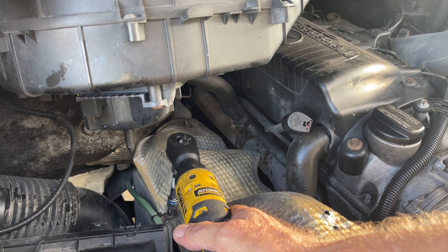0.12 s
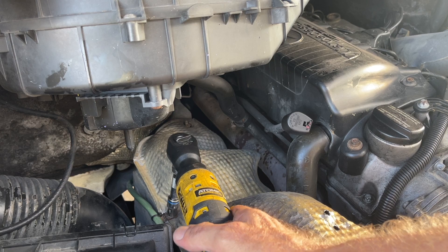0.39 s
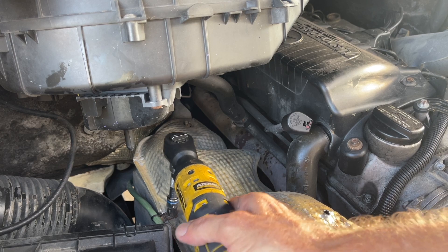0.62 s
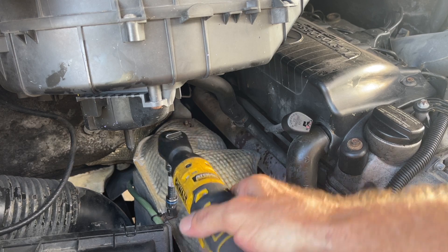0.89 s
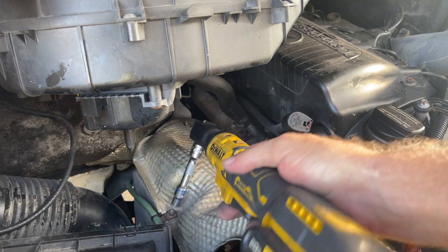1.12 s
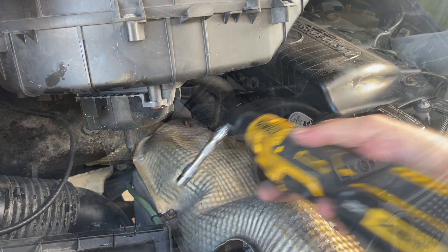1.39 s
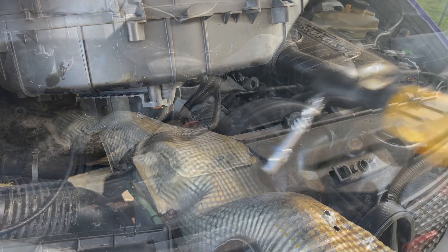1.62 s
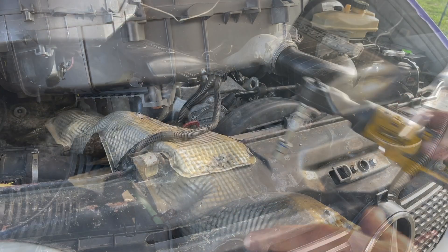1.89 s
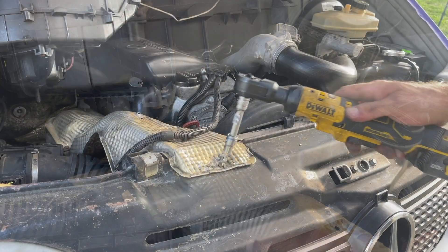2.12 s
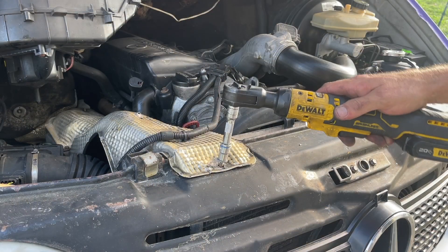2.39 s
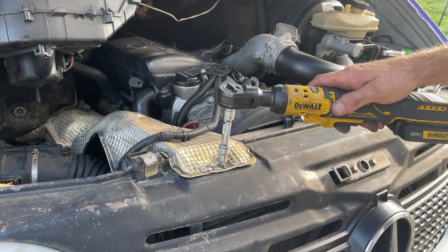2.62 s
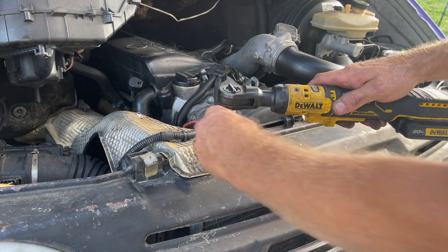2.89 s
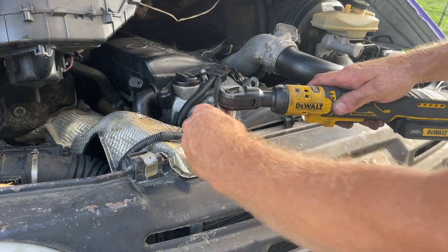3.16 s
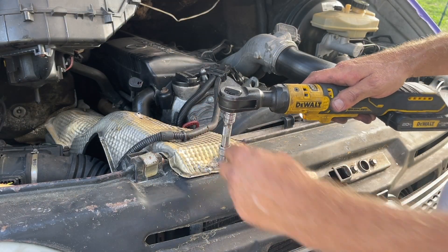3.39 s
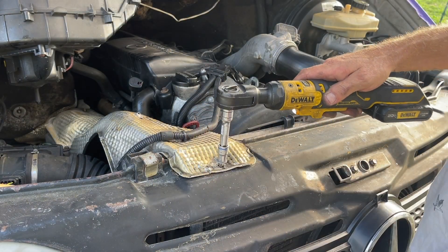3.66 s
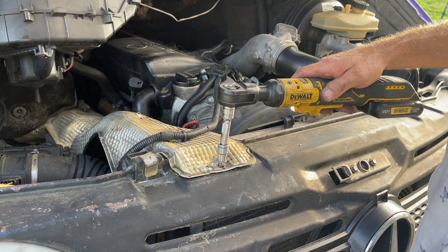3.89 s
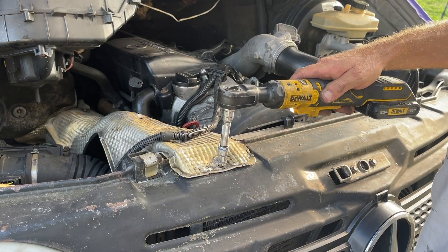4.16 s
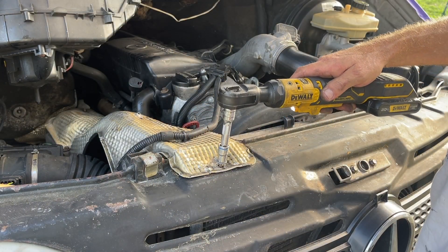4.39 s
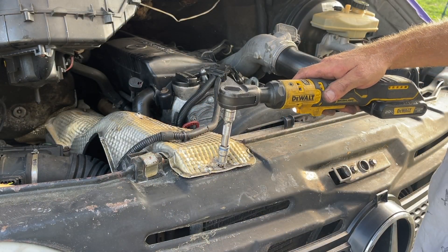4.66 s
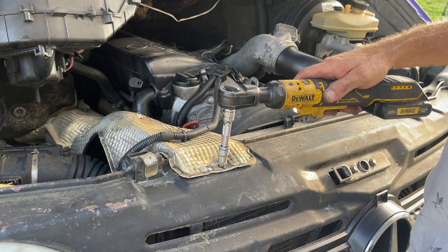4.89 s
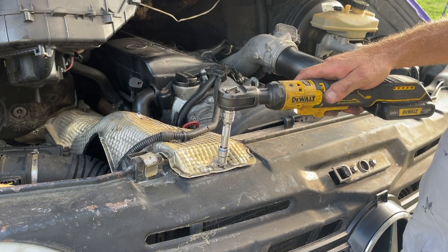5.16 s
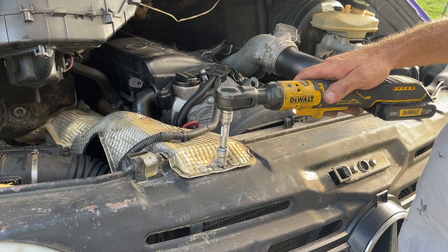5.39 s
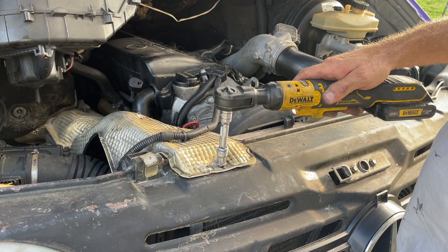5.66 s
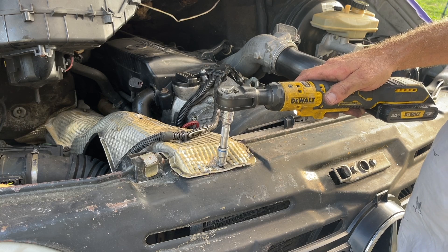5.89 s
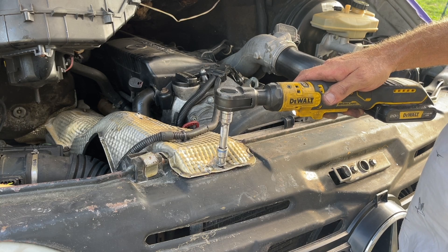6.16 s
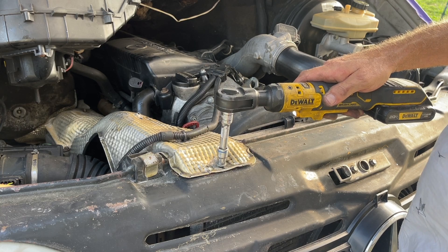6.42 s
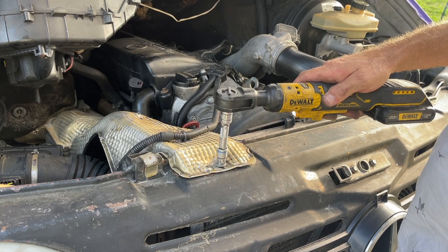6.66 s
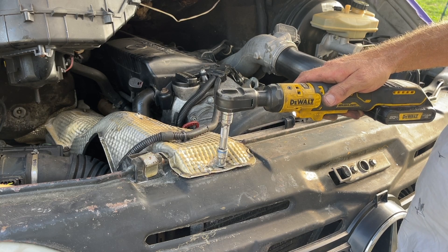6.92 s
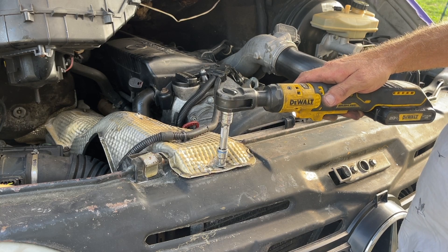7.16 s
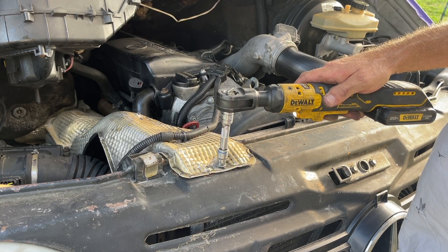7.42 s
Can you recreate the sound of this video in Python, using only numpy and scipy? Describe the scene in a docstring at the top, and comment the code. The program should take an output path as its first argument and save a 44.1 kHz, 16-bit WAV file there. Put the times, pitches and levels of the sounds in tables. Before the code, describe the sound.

Close stereo pickup in an open engine bay outdoors, with low air rumble and very faint outdoor noise. From 0 to 0.4 s a cordless ratchet ends a slow burst: about eight turns a second, each a bright ringing double click over motor whirr and gear whine. It stops. Soft hand thumps follow, light knocks from 0.8 s and a sharper one at 1.05 s, then near quiet with faint rubbing. Metal clacks come at 2.2 to 2.3 s, the strongest socket clunk at 2.38 s. At about 2.8 s the motor restarts; double clicks begin at 2.9 s, quicken, and from 3.6 s merge into a fast rattling buzz with rising whine. It steps up again near 4.8 s, peaking around 5.2 s, eases slightly, then drops from 6.15 s. By 6.7 s it is quieter, even clicking at about fifteen turns a second, still running at the 7.5 s end.

```python
"""A cordless ratchet in an open engine bay: the end of a slow burst, the tool is lifted off and set on another bolt,
then it runs up, spins fast and slows again. Once a crank turn the pawl skips back over two teeth (a bright double click
of ringing contact bursts), then drives the wheel while the gear teeth whine as a stack of partials.
The motor whirrs under it (noise, housing rings, shaft tones), and the hand knocks and rubs on metal.
Low air rumble on the microphone and a faint outdoor noise lie behind."""
import sys
import numpy as np
from scipy import signal
from scipy.fft import rfft, irfft, next_fast_len
from scipy.io import wavfile

SR = 44100
rng = np.random.default_rng(int(sys.argv[2]) if len(sys.argv) > 2 else 0)


def volts_from_db(level):
    """Convert decibel levels to linear amplitude ratios."""
    exponent = np.asarray(level, float) / 20
    return 10 ** exponent


def to_wav(sig):
    """Store sig (one row per channel, or 1-D mono) as 16-bit WAV at the path in sys.argv[1].

    Samples outside -1..1 are clipped; the rate is SR.
    """
    pcm = np.clip(np.atleast_2d(sig), -1, 1) * 32767
    pcm = np.round(pcm).astype(np.int16)
    wavfile.write(sys.argv[1], SR, pcm.T)  # frames by channels


N = 332514  # length in samples

# Trigger pulls. Each row: start in seconds, first click in seconds.
PULLS = [(0, .096), (2.765, 2.8862)]
USUAL_SPEED = 17  # crank turns per second at which the tool's levels are stated


def rms_one(x):
    """Scale to an rms of one."""
    return x / np.sqrt(np.mean(x ** 2) + 1e-20)


def in_time(rows, off=None):
    """Draw each column as a curve over time; off is the value outside the rows."""
    s, *columns = np.transpose(rows)
    return [np.interp(np.arange(N) / SR, s, column, left=off, right=off) for column in columns]


def at_hz(points, hz):
    """Read a (Hz, value) curve on a logarithmic frequency axis."""
    point_hz, value = np.transpose(points)
    return np.interp(np.log(hz + 1), np.log(point_hz), value)


def colour(x, points):
    """Filter by a (Hz, dB) curve."""
    size = next_fast_len(N)
    gain = volts_from_db(at_hz(points, np.fft.rfftfreq(size, 1 / SR)))
    return irfft(rfft(x, size) * gain, size)[..., :N]


def drift(rate_hz):
    """Slow random wander of rms one: noise through two equal low-pass poles."""
    r = np.exp(-2 * np.pi * rate_hz / SR)
    wander = signal.lfilter([1], [1, -2 * r, r * r], rng.standard_normal(N + SR))
    return rms_one(wander[SR:])


def held(start_s, length_s, edge_s):
    """Envelope that ramps up, holds at one and ramps down."""
    t = np.arange(N) / SR
    return np.clip(np.minimum(t - start_s, start_s + length_s - t) / edge_s, 0, 1)


def dying_away(x, t60_s):
    """Give every impulse an exponential tail that falls 60 dB in t60_s."""
    return signal.lfilter([1], [1, -volts_from_db(-60 / (t60_s * SR))], x + 1e-18)


def resonate(x, hz, width_hz):
    """One ringing mode: a two-pole resonator."""
    r = np.exp(-np.pi * width_hz / SR)
    poles = [1, -2 * r * np.cos(2 * np.pi * hz / SR), r * r]
    return signal.lfilter([(1 - r * r) / 2, 0, (r * r - 1) / 2], poles, x + 1e-18)


def bank(x, modes):
    """Modes of (Hz, width Hz, dB) ringing side by side with alternating sign."""
    return sum((-1) ** k * volts_from_db(db) * resonate(x, hz, width) for k, (hz, width, db) in enumerate(modes))


def grains(per_s, spread_db):
    """Random sparse impulses of either sign and uneven size."""
    sizes = volts_from_db(spread_db * np.minimum(rng.exponential(1, N), 4)) * rng.choice([-1, 1], N)
    return sizes * (rng.random(N) < per_s / SR)


def stereo_noise(points, side_db):
    """Coloured noise: a part common to both channels and a part opposed, at side_db against it."""
    mid, side = rng.standard_normal((2, N))
    return rms_one(colour(mid + volts_from_db(side_db) * side * [[1], [-1]], points))


def crank(speed):
    """Turn phase 0-1 counted from the first click, and the train of tooth strikes, two a turn."""
    # How hard the pawl snaps in the fast run. Each row: seconds, strike level in dB.
    snap = [(3.62, -19.5), (3.88, -18.5), (3.95, -23), (4.3, -22), (5.1, -24.5), (5.6, -26), (6.4, -25.5)]
    # Slow turns, each heard as its own double click.
    # Each row: start in seconds, first tooth level in dB, gap in ms, second tooth level in dB.
    slow_clicks = [(0.0005, -22.5, 2.4, -29), (0.0974, -13, 18, -18), (0.218, -15, 17, -16.5),
                   (0.34, -14, 20.2, -19), (2.8877, -13, 16.8, -15.5), (2.9744, -15, 13, -17.5),
                   (3.0466, -19.5, 7.4, -17.5), (3.1107, -19.5, 10, -18.5), (3.1682, -20.5, 10.5, -18),
                   (3.224, -19.5, 11, -18.5), (3.2812, -19, 9.8, -16), (3.3381, -12, 7.1, -21),
                   (3.3927, -18.5, 9.0, -21.5), (3.4466, -17.5, 9.2, -24), (3.4993, -19.5, 8.5, -26),
                   (3.5481, -17.5, 7.8, -22.5), (3.5849, -16.5, 5.4, -18.5), (3.6165, -15, 1.4, -23),
                   (6.3265, -31.5, 1.9, -28.5), (6.3553, -27.5, 4.8, -26.5), (6.385, -23, 4.2, -22),
                   (6.4212, -22.5, 3.5, -22.5), (6.4568, -20.5, 6.4, -28), (6.497, -26, 7, -26.5),
                   (6.5414, -26, 10, -31), (6.5898, -29.5, 8.4, -27.5), (6.6454, -26, 6.8, -24),
                   (6.7055, -25, 11.1, -24), (6.7712, -20.5, 8.4, -27), (6.8323, -25, 10.6, -29.5),
                   (6.8957, -26, 10.9, -28.5), (6.9603, -25.5, 11.5, -24.5), (7.0244, -24.5, 12.0, -20.5),
                   (7.0868, -26, 11.8, -26.5), (7.1529, -28, 10.8, -27.5), (7.2194, -27.5, 10.7, -28),
                   (7.2824, -23.5, 11, -25.5), (7.348, -22.5, 11.8, -26.5), (7.4107, -27.5, 8.2, -24.5),
                   (7.4737, -28.5, 10, -23.5)]
    # Between these two times in seconds the clicks follow the crank.
    fast_run = (3.633, 6.312)
    second_tooth = .16  # share of a turn after the first
    # the gear train loads the pawl unevenly, over this many turns
    wobble_turns, wobble_db, wobble_peak_turn = 5.25, 1, 2.2
    click_spread_db = 2

    t = np.arange(N) / SR
    total = np.cumsum(speed) / SR
    phase, strikes = np.zeros(N), np.zeros(N)
    (snap_db,) = in_time(snap)
    for start, first in PULLS:
        turns = total - np.interp(first, t, total)
        phase[t >= start] = turns[t >= start] % 1

    whole = np.arange(*np.ceil(np.interp(fast_run, t, turns)))
    luck = rng.normal(0, 1, (len(whole), 3))
    wobble = wobble_db * np.cos(2 * np.pi * (whole - wobble_peak_turn) / wobble_turns)
    for tooth in range(2):
        # strikes fall slightly ahead of the mark on average, with jitter shared by both teeth
        strike_turn = whole + tooth * second_tooth - .012 + .015 * luck[:, 2]
        i = (np.interp(strike_turn, turns, t) * SR).astype(int)
        strikes[i] = volts_from_db(snap_db[i] + wobble + click_spread_db * luck[:, tooth])
    for s, first_db, gap_ms, second_db in slow_clicks:
        pair = [int(s * SR), int((s + gap_ms / 1000) * SR)]
        strikes[pair] = volts_from_db(np.array([first_db, second_db]))
    return phase, strikes


def pawl(strikes, rattle_db, phase):
    """Each tooth click is a short burst of contact, a bounce and dying chatter; loose parts rattle on through the turn."""
    # Ratchet head rings. Each row: Hz, width in Hz, relative dB.
    head = [(7625, 207, 0), (7741, 257, 2), (8243, 345, 3), (8464, 217, 5), (8675, 443, 0),
            (9250, 440, -2.5), (10450, 1100, -4.5), (11800, 350, -10), (11700, 1200, -11.5)]
    # Dull part of a click. Each row: Hz, relative dB.
    click_body = [(300, -57.5), (1500, -4), (3000, -11), (4500, 0), (6500, -0.5), (9000, -50)]
    # The clicks' dull part against their ring. Each row: seconds, relative dB.
    body_level = [(0, 1), (2.9, 2.5), (3.6, 0), (6.2, -0.5), (6.5, -1), (7.54, -0.5)]

    bounced = strikes + 0.21 * np.roll(strikes, round(0.0036 * SR))
    contact = dying_away(bounced, 0.0097)
    tail = dying_away(strikes, 0.14)
    thud = 0.44 * dying_away(bounced, 0.019)
    chatter = 0.67 * contact * rng.standard_normal(N) + 0.15 * tail * grains(1500., 3.8)
    ring = bank(chatter + 2.94 * bounced, head)
    # the head radiates little below 7 kHz
    head_cut = signal.butter(6, 7000, "high", fs=SR, output="sos")
    ring = volts_from_db(17.0) * signal.sosfilt(head_cut, ring)
    body = volts_from_db(-4.5 + in_time(body_level)[0]) * colour(thud * rng.standard_normal(N), click_body)
    # the rattle is strongest early in the turn and fades through it
    fading = volts_from_db(rattle_db + 8.9 * (.5 - (phase - .06) % 1))
    rattle = fading * rms_one(bank(grains(3000., 7.1), head))
    return ring + body + rattle


def gears(speed, phase, whine_db):
    """Tooth partials swell on the driving stroke, their pitch sagging from its early part to its late part."""
    # Radiation of the gear teeth. Each row: Hz, dB.
    gear_colour = [(300, -2.5), (670, -13.5), (1100, -15), (1750, -15.5), (2050, -11.5), (2300, -19.5),
                   (2550, -6.5), (2850, -6), (3100, -10.5), (3350, -5), (3500, -9), (3750, -5), (4080, -1),
                   (4380, -9), (4620, -12), (5000, -7), (7000, -21.5)]
    # Strength of tooth partials 1, 2, 3 .. in relative dB.
    partials_db = [-7, 1.5, 3.5, 0, 1, 0, -0.5, -3.5, -7]
    # Gear tones that hold for a while.
    # Each row: start in seconds, length in seconds, multiple of tooth rate, relative dB.
    strain = [(3.203, 0.3, 1.005, -60), (3.697, .13, 3.92, -50), (3.784, 0.098, 2.92, -45.5),
              (3.86, 0.75, 1.104, -63)]
    teeth_per_turn = 36.6
    # driving stroke: start in turns, width in turns at usual speed, power of speed by which it narrows
    drive_from, drive_width, drive_narrows = 0.309, .11, 0.51
    sing_from_speed = 43.7  # turns per s; above it the sixth partial turns clean

    width = drive_width * (USUAL_SPEED / speed) ** drive_narrows
    middle = drive_from + 1.51 * width
    load = np.exp(-((phase - middle) / width) ** 2 / 2)
    sag = .2 * (phase - middle) * load
    tooth_hz = teeth_per_turn * speed * (1.002 + .2 / speed - sag + .005 * drift(25.))
    angle = 2 * np.pi * np.cumsum(tooth_hz) / SR
    whine = 0
    for k, db in enumerate(partials_db, 1):
        strength = volts_from_db(db + at_hz(gear_colour, k * tooth_hz) + 1.1 * drift(5.1))
        whine = whine + strength * np.sin(k * angle + k * k)
    grind = rms_one(colour(grains(4000., 1.8), gear_colour))

    steady = 2 * np.pi * teeth_per_turn * np.cumsum(speed) / SR  # angle without the sag
    sing_level = volts_from_db(-38 + 1.7 * drift(8.0)) * np.clip((speed - sing_from_speed) / 2, 0, 1)
    tones = sing_level * np.sin(6 * steady + 0.45 * drift(60.))
    for s, length, k, db in strain:
        envelope = volts_from_db(db + 3.9 * drift(27.0)) * held(s, length, 0.017)
        tones = tones + envelope * np.sin(k * steady + 1.1 * drift(40.))
    return volts_from_db(whine_db) * (.06 + load) * (1.2 * whine + .3 * grind) + 1.4 * tones


def motor(speed, phase, whirr_db, housing_db, hum_db, whistle_db):
    """Broad whirr, the housing ringing in lumps, low shaft tones, and the controller's switching whistle."""
    # Whirr. Each row: Hz, relative dB.
    whirr_colour = [(150, -10.5), (300, -1), (1000, -6.5), (2100, -4.5), (4000, -4), (7000, -2),
                    (10000, -3), (11500, 6), (13000, -9.5)]
    # Housing rings. Each row: Hz, width in Hz, relative dB.
    housing_modes = [(664, 60, 2.5), (726, 337, -1.5), (863, 30, 3), (1410, 150, -7.5)]
    # The housing's ring. Each row: seconds, change in dB.
    housing_level = [(0, -0.5), (2.8, -1.5), (3.5, -2.5), (3.7, -3), (6.4, 1), (7.54, -3.5)]
    # Shaft tones. Each row: multiple of crank speed, relative dB.
    shaft = [(3, -9.5), (5.625, -3.5), (7.625, -5)]
    # Shaft tones that stand out for a while.
    # Each row: start in seconds, length in seconds, multiple of crank speed, dB.
    drone_rows = [(3.58, 0.26, 5.5, -51.5), (3.836, 0.11, 6.5, -49.5), (3.74, 0.4, 2.93, -58.5),
                  (3.97, 0.73, 4, -58.5), (4.84, 0.58, 1, -57.5), (5.046, 0.25, 2, -51),
                  (5.452, 0.67, 2, -63.5), (4., .76, 5.625, -64), (5.4, 0.85, 5.625, -64.5)]

    # the whirr is radiated all along the housing, so it is wide
    whirr_swell = volts_from_db(1.63 * drift(32.0) + 1.93 * np.cos(2 * np.pi * (phase - .3)))
    whirr = stereo_noise(whirr_colour, side_db=-13.0) * whirr_swell
    lumps = volts_from_db(2.3 * drift(27.0) + 3.3 * np.cos(2 * np.pi * (phase - .42)))
    housing = rms_one(bank(rng.standard_normal(N) * lumps, housing_modes))
    housing = housing * volts_from_db(in_time(housing_level)[0])
    angle = 2 * np.pi * np.cumsum(speed) / SR
    hum = sum(volts_from_db(db + 2.5 * drift(2.0)) * np.sin(k * angle + 0.024 * k * drift(28.0)) for k, db in shaft)
    drones = sum(volts_from_db(db + 1.5 * drift(5.3)) * held(s, length, 0.02) * np.sin(k * angle)
                 for s, length, k, db in drone_rows)
    # noise through two narrow resonators in a row wavers like an unsteady tone
    whistle_hz, width_hz = 8870, 263.6
    narrow = resonate(rng.standard_normal(N), whistle_hz, width_hz)
    whistle = rms_one(resonate(narrow, whistle_hz, width_hz))
    return (volts_from_db(whirr_db) * whirr + volts_from_db(housing_db) * housing + volts_from_db(hum_db) * hum
            + drones + volts_from_db(whistle_db) * whistle)


def knocks():
    """Bursts of contact noise that die away; the same noise shakes the panel's modes, with new strengths each time."""
    # Knocks of tool and socket on metal. Each row: start in seconds, level in dB, ring relative dB,
    # contact decay t60 in seconds, Hz near which the struck spot rings best.
    knock_rows = [(0.4486, -58, 5, 0.13, 1490), (.778, -67.5, 17, 0.17, 600), (0.7988, -55, 10, 0.15, 650),
                  (0.8679, -48, 3.5, 0.17, 796), (0.895, -42.5, 0, 0.086, 750),
                  (0.968, -53.5, 13, 0.19, 650), (0.9993, -50, 9, 0.079, 950),
                  (1.0488, -29, 5.5, 0.064, 2435), (1.0561, -35.5, 9.5, 0.1, 940),
                  (1.2244, -68.5, 0, 0.092, 1100), (1.691, -54, -20, 0.051, 1660),
                  (1.752, -54.5, -13.5, 0.052, 1400), (1.949, -59.5, 2, 0.051, 700),
                  (2.1843, -32.5, 6, 0.08, 900), (2.2437, -47, 7, 0.21, 1500),
                  (2.279, -34, -7, 0.027, 1410), (2.354, -58, 16, 0.16, 1450),
                  (2.3748, -25.5, 2, 0.082, 1400), (2.3824, -20.5, -7, 0.096, 555),
                  (2.5226, -52, 6, 0.061, 1390), (2.562, -59.5, 14.5, 0.05, 1600),
                  (2.646, -62.5, -5, 0.13, 1710)]
    # Modes of the struck metal. Each row: Hz, relative dB, t60 in seconds.
    panel = [(275, 21.5, 0.53), (502, -3, 0.2), (628, -6.5, 0.38), (699, -6, 0.079), (870, 3, 0.19),
             (1027, -11.5, 0.45), (1146, -4.5, 0.63), (1418, -3.5, 0.18), (1530, -16, .4), (1543, -7, 0.16),
             (1724, -9.5, 0.054), (2435, -9, 0.15), (3780, -8, 0.08), (4670, -10, .065)]
    spot_db_per_octave = 13.0  # modes away from the spot's pitch are struck less

    t = np.arange(SR // 2) / SR
    noise = rms_one(colour(rng.standard_normal(N), [
        (100, -22), (280, -13), (800, -5.5), (1600, -8.5), (3000, -8.5), (9000, -9.5), (12500, -13.5)]))
    dull = rms_one(colour(rng.standard_normal(N), [
        (120, -19.0), (280, 0.5), (420, -6.5), (800, -3.5), (1500, -15.0), (3000, -34.0)]))
    luck_db = rng.normal(0, 3, (len(knock_rows), len(panel)))
    contact, boom, shake = np.zeros(N), np.zeros(N), np.zeros((len(panel), N))
    for (s, db, low_db, t60, spot_hz), draw_db in zip(knock_rows, luck_db):
        i = int(s * SR)
        burst = volts_from_db(db - 8.5 - 60 * t / np.clip(t60, .02, .5)) * np.minimum(t / 0.0013, 1) ** 2
        contact[i:i + len(t)] += burst
        # the bodywork booms on for longer
        boom_db = db - 13.0 + 0.56 * low_db - 60 * t / np.clip(2.61 * t60, .02, .5)
        boom[i:i + len(t)] += volts_from_db(boom_db) * np.minimum(t / 0.0043, 1)
        octaves_off = abs(np.log2(np.array(panel)[:, 0] / spot_hz))
        mode_gain = volts_from_db(low_db + draw_db - spot_db_per_octave * octaves_off)
        shake[:, i:i + len(t)] += mode_gain[:, None] * burst
    # a mode's width in Hz follows from its decay time
    rings = sum(volts_from_db(db + 21.0) * resonate(noise * envelope, hz, np.log(1000) / np.pi / t60)
                for (hz, db, t60), envelope in zip(panel, shake))
    return noise * contact + dull * boom + rings


def bay(x):
    """Direct sound reaches two ports with its own level and phase; sound scattered by metal around differs at each."""
    # Scattered sound in the bay. Each row: Hz, dB.
    echoes = [(200, -21.5), (600, -1.5), (2500, -5), (6000, -4), (9000, -22.5), (12500, -0.5)]
    # Between the two microphone ports. Each row: Hz, radians by which left leads.
    lead = [(0, 0), (780, 0.1), (1460, -.2), (2670, .7), (3700, 0.08), (5080, 1.48), (6630, 0.75),
            (7320, 0.96), (7750, 1.36), (8870, -1.17), (9820, -2), (10400, -3), (11200, -5.8),
            (12300, -6.2)]
    # Each row: Hz, left minus right in dB.
    lean = [(60, -1), (230, 2), (850, 2.5), (3220, 3.5), (12200, 0.5)]
    bay_t60_s = 0.067

    size = next_fast_len(N)
    side = np.array([[.5], [-.5]])
    hz = np.fft.rfftfreq(size, 1 / SR)
    t = np.arange(SR // 8) / SR
    ports = volts_from_db(side * at_hz(lean, hz)) * np.exp(1j * side * np.interp(hz, *np.transpose(lead)))
    scatter = rng.standard_normal((2, len(t))) * volts_from_db(-60 * t / bay_t60_s) * (t > .001)
    scatter = rfft(scatter / np.linalg.norm(scatter[0]), size) * volts_from_db(at_hz(echoes, hz))
    return irfft(rfft(x, size) * (ports + scatter), size)[:, :N]


def rubbing():
    """Sleeve and tool rubbing: wide coloured noise in strokes, its level fluttering."""
    # Each row: start in seconds, length in seconds, dB.
    rub_rows = [(1.21, 0.43, -82.5), (1.808, 0.15, -75), (2.204, 0.38, -79), (2.594, 0.23, -85)]
    # Each row: Hz, relative dB.
    rub_colour = [(600, -6.5), (2000, -14), (4800, 3), (6500, -3), (8500, 6.5), (11000, 6), (12500, -28)]
    strokes = sum(volts_from_db(db) * held(s, length, 0.014) for s, length, db in rub_rows)
    return strokes * volts_from_db(2.8 * drift(22.0)) * stereo_noise(rub_colour, side_db=-1.0)


def thumps():
    """Soft pushes of the hand on bodywork: brief, mostly low tones that swell and die."""
    # Each row: start in seconds, relative dB, Hz.
    thump_rows = [(0.39, -26, 60.3), (0.509, -30, 78.5), (0.632, -28.5, 107), (0.685, -34, 94),
                  (0.825, -31, 54.4), (1.231, -40.5, 57), (1.358, -49, 169), (1.673, -39, 81),
                  (1.925, -59, 77.6), (2.183, -37, 718), (2.213, -42, 105), (2.392, -28.5, 181)]
    out, t = np.zeros(N), np.arange(SR // 5) / SR
    push = (t / 0.016) * np.exp(-t / 0.011)
    for s, db, hz in thump_rows:
        out[int(s * SR):][:len(t)] += volts_from_db(db + 4.0) * push * np.sin(2 * np.pi * hz * t)
    return out


def air_rumble():
    """Air on the microphone: low, nearly central noise with slow level changes, swells and flutter."""
    # Each row: seconds, dB.
    rumble_level = [(0, -59), (.6, -62), (2, -61.5), (4.3, -61), (5.4, -71), (6.5, -66), (7.54, -66.5)]
    # Swells of the rumble. Each row: top in seconds, dB, half length in seconds.
    swells = [(0.414, -40, 0.031), (0.855, -55, 0.074), (1.94, -57.5, 0.03), (2.425, -48.5, 0.13),
              (2.957, -62, 0.14), (3.248, -55, 0.036), (5.188, -68, 0.12)]
    # Each row: Hz, relative dB.
    rumble_colour = [(15, -24.5), (25, -29.5), (64, 0.5), (130, -0.5), (254, -12.5), (373, -25.5),
                     (400, -24.5), (520, -44), (880, -120)]
    t = np.arange(N) / SR
    air = volts_from_db(in_time(rumble_level)[0])
    air = air + sum(volts_from_db(db) * np.exp(-((t - s) / half) ** 2) for s, db, half in swells)
    return air * volts_from_db(3.8 * drift(28.0)) * stereo_noise(rumble_colour, side_db=-14.0)


def far_background():
    """Steady, wide, faint outdoor noise."""
    # Each row: Hz, relative dB.
    outdoors = [(120, -20.5), (200, -2), (513, -13.5), (888, -8.5), (2320, -24), (9280, -35),
                (12000, -31.5), (15600, -69), (22000, -120)]
    return volts_from_db(-78.5) * stereo_noise(outdoors, side_db=1.0)


def follows(law, effort_db, speed):
    """Level in dB of one part of the tool as effort and crank speed change."""
    usual_effort_db = -45
    db, share, per_doubling_db = law
    return db + share * (effort_db - usual_effort_db) + per_doubling_db * np.log2(speed / USUAL_SPEED)


def scene():
    """The tool and knocks heard through the bay, with rubbing, pushes, rumble and outdoors beside them."""
    # Crank speed. Each row: seconds, turns per second.
    speed_rows = [(0, 8.26), (.42, 8.26), (2.77, 6), (2.89, 9.11), (2.988, 14.05), (3.181, 17.61),
                  (3.51, 18.61), (3.578, 29.75), (3.73, 41.2), (4.06, 46.26), (4.7, 46.45), (4.77, 52.6),
                  (4.88, 57.4), (4.942, 59.42), (5.24, 60.34), (5.31, 57.9), (5.5, 55.6), (6.147, 54.57),
                  (6.332, 34.9), (6.495, 23.53), (6.678, 15.72), (7.54, 15.45)]
    # How loud the tool runs, one curve a pull. Each row of a curve: seconds, dB.
    effort_curves = [
        [(0, -44.5), (.25, -45), (.39, -44.5), (.43, -69), (.5, -105)],
        [(2.765, -70), (2.83, -51), (2.9, -43.5), (3.05, -44), (3.47, -48), (3.65, -44), (3.84, -39.5),
         (4., -43.5), (4.8, -42), (4.92, -39.5), (5.15, -39.5), (5.38, -44.5), (6.08, -44), (6.36, -47.5),
         (6.75, -52.5), (7.54, -51)],
    ]
    # Load on the gears. Each row: seconds, change in dB.
    whine_level = [(0, 0), (2.9, 1), (3.55, 2.5), (4.7, 0.5), (4.87, 3.5), (5.0, -1), (5.35, 0.5),
                   (6.2, 1.5), (6.45, 1.5), (7.54, 1)]
    # Colour of the tool down at the first bolt. Each row: Hz, dB.
    first_spot = [(300, 2), (700, 7), (1100, 3), (2500, 0.5), (4500, -1.1), (6500, -3), (8300, -5),
                  (9500, -4), (11500, -5)]
    # Each law: dB at usual effort and speed ahead of the source's own shaping,
    # share of the effort's swing, dB per doubling of speed.
    rattle_law = (-56.5, 1.8, 7.1)
    whine_law = (-47, 0.77, 2.8)
    whirr_law = (-45, 0.92, 0.11)
    housing_law = (-56.5, 1.1, -4)
    hum_law = (-68, 0.67, 3.6)
    whistle_law = (-53, 1, 0.5)

    t = np.arange(N) / SR
    (speed,) = in_time(speed_rows)
    effort_db = np.max([in_time(curve, -130)[0] for curve in effort_curves], axis=0)
    phase, strikes = crank(speed)
    rattle_db = follows(rattle_law, effort_db, speed)
    whine_db = follows(whine_law, effort_db, speed) + in_time(whine_level)[0]
    whirr_db = follows(whirr_law, effort_db, speed)
    housing_db = follows(housing_law, effort_db, speed)
    hum_db = follows(hum_law, effort_db, speed)
    # below an effort of -64 dB the whistle dies away faster
    whistle_db = follows(whistle_law, effort_db, speed) + np.minimum(effort_db + 64, 0)

    tool = pawl(strikes, rattle_db, phase) + gears(speed, phase, whine_db)
    tool = tool + motor(speed, phase, whirr_db, housing_db, hum_db, whistle_db)
    second_pull_s = PULLS[1][0]
    tool = np.where(t < second_pull_s, colour(tool, first_spot), tool)
    low = (air_rumble() + thumps()) * volts_from_db([[.6], [-.6]])  # a little stronger on the left
    return bay(tool + knocks()) + rubbing() + low + far_background()


def roll_off(x):
    """The treble ends steeply here."""
    return signal.sosfilt(signal.butter(12, 12750, fs=SR, output="sos"), x)


def record(dry):
    """Microphone colour with a notch and a falling top."""
    # Each row: Hz, dB.
    mic = [(100, -4), (3000, 2.5), (9700, -2.5), (10150, -19.5), (10350, -1), (10700, -4), (12300, -13.5),
           (12800, -14.5), (13500, -23), (16500, -61.5)]
    return roll_off(colour(dry, mic))


dry = scene()
out = record(dry)
to_wav(out)
```